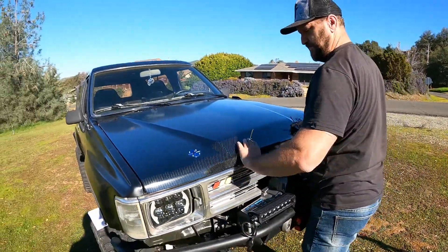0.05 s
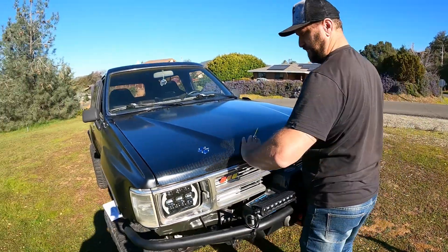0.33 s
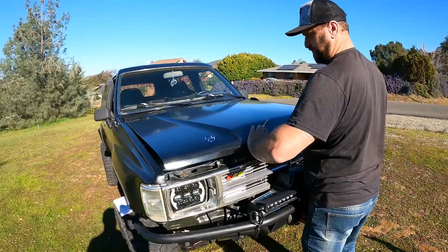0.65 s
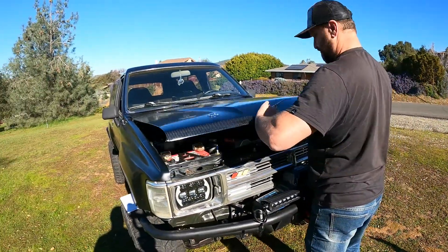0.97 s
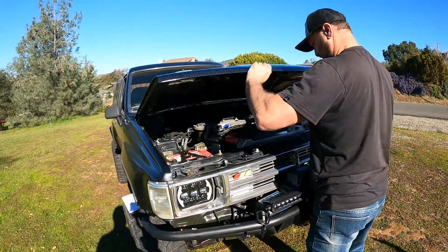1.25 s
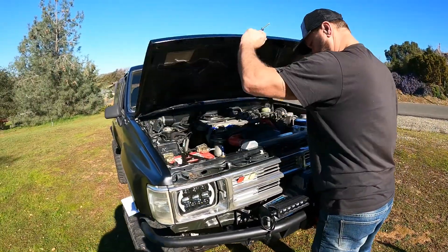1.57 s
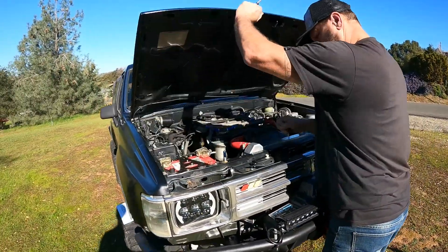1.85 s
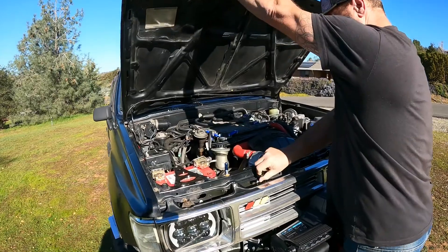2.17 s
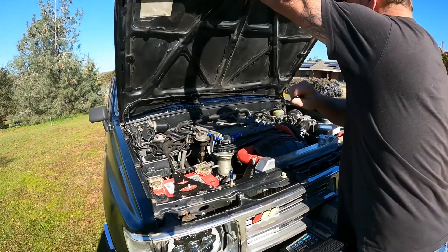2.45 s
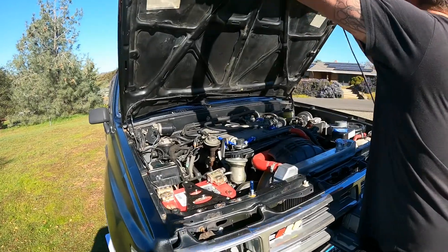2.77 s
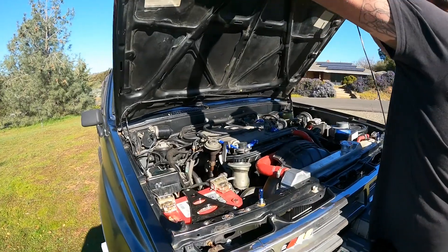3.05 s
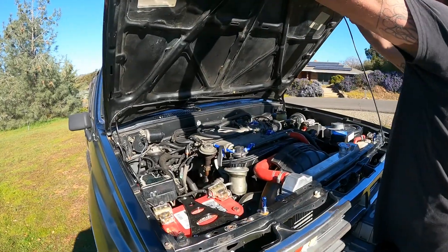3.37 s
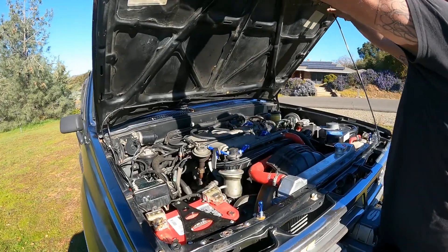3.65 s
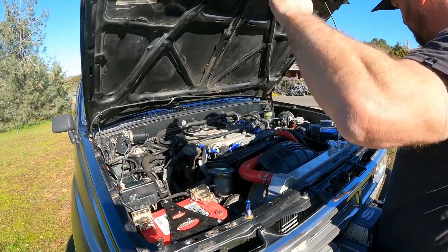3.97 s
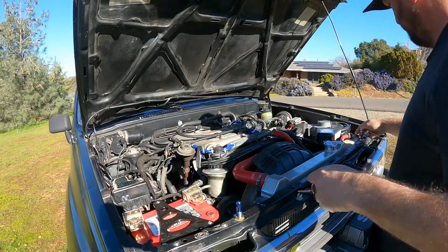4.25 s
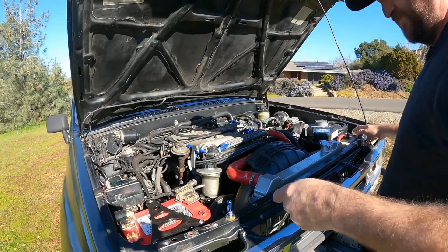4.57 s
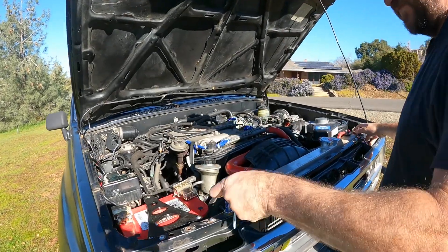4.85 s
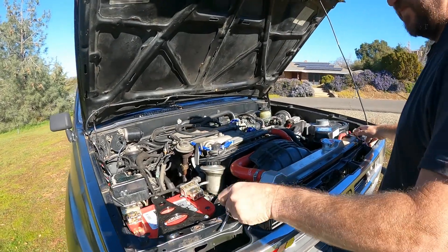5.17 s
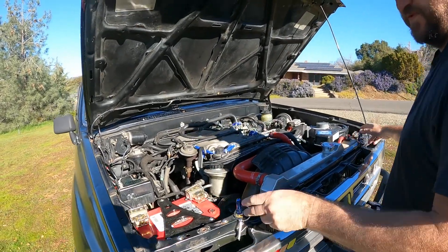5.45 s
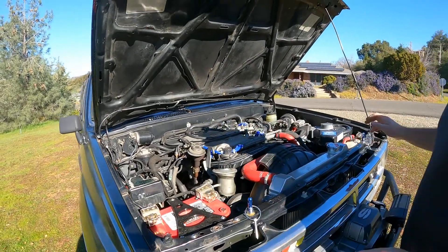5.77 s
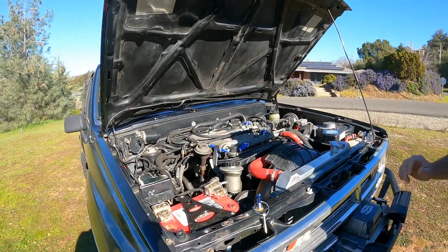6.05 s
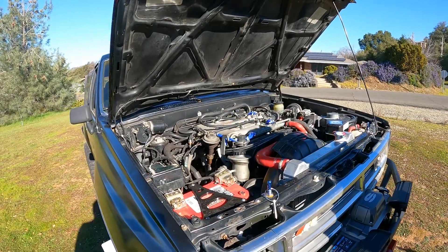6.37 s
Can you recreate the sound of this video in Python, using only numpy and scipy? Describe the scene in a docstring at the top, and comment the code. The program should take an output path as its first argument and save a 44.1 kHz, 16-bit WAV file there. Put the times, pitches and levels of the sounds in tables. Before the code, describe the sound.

A steel vehicle hood is opened close by in the open air: the catch knocks free, the hinge gives a brief stuttering squeal, and a few metal knocks lead to a loud clunk as the hood settles on its rod. A wrench bounces down in a quick run of bright clinks, and shoes shift softly on dry grass. Low wind buffeting on the microphone comes and goes throughout, over very faint birds and a distant hum.

```python
"""Outdoors, wind buffets the microphone over a hush, a far machine hum, birds and shoes on dry grass.
A truck's steel hood is unlatched: the panel knocks and the catch scrapes free. The hood rises on a dry
hinge that sticks and slips, juddering into a squeal. The prop rod is unclipped, scrapes and squeaks into
its seat, and the hood drops onto it. Last, a wrench clatters down in the engine bay and the shoes shift."""
import sys
import numpy as np
from scipy import signal
from scipy.fft import rfft, irfft
from scipy.io import wavfile
from scipy.ndimage import uniform_filter1d

SR = 44100
rng = np.random.default_rng(int(sys.argv[2]) if len(sys.argv) > 2 else 0)


def waveform_to_disk(signal):
    """Save audio, clipped to [-1, 1], as 16-bit WAV at the path in sys.argv[1]."""
    frames = np.transpose(np.atleast_2d(signal))
    scaled = np.clip(frames, -1, 1) * 32767
    samples = np.round(scaled).astype(np.int16)
    wavfile.write(sys.argv[1], SR, samples)


N = 287091
T = np.arange(N) / SR

WIND_LEVEL = [(0, -39), (.11, -22), (.47, -25), (.7, -20), (1.08, -26.5), (1.4, -22.5), (1.65, -22.5),
              (2.05, -35.5), (2.35, -40), (2.55, -27.5), (3.3, -36), (3.5, -30), (3.72, -31), (3.93, -22),
              (4.3, -40), (4.55, -22.5), (5.9, -23), (6.51, -16.5)]  # wind strength: time_s, level_db
WIND_SPECTRUM = [(5, -51), (16, -7), (28, -1), (45, 2), (70, 1.5), (100, -3.5), (140, -6), (200, -15),
                 (280, -28), (450, -34), (900, -61), (2000, -95.5)]  # turbulent rumble: freq_hz, density_db
EDDY_HITS = [(4.7, 0.07, -21), (4.98, 0.037, -18.5), (5.19, 0.034, -14.5), (5.36, 0.016, -14),
             (5.6, 0.098, -15.5), (6.06, 0.047, -16)]  # eddies square on the microphone: start_s, hold_s, level_db
EDDY_SPECTRUM = [(16, -8), (40, -4), (75, 5.5), (140, 3.5), (200, -8), (320, -19), (800, -37.5),
                 (2500, -72)]  # those eddies: freq_hz, density_db
HUSH_LEVEL = [(0, -44), (.13, -46), (.23, -54), (.65, -48), (.9, -54), (1.9, -55), (2.8, -50), (3.3, -54.5),
              (4.2, -53), (4.6, -57), (5.8, -52.5), (6.1, -51), (6.51, -49)]  # background hush, dipping after loud sounds and creeping back: time_s, level_db
HUSH_SPECTRUM = [(100, -1), (400, 0.5), (650, -9), (1100, -9), (1800, -14), (3000, -16.5), (4500, -18.5),
                 (7000, -25), (10000, -33.5), (12300, -31), (14000, -62.5)]  # background hush: freq_hz, density_db
HUM_TONES = [(366, -51.5), (452, -65.5), (1098, -68)]  # far machine: pitch_hz, level_db
BIRD_CALLS = [(.05, .25, 4750, 4400, -64), (.33, 0.32, 4650, 4400, -64), (2.85, 0.22, 4850, 4000, -68),
              (4.872, 0.04, 6900, 7900, -55), (6.17, 0.064, 4060, 4450, -59), (6.29, .08, 4050, 4450, -65)]  # far birds: start_s, length_s, from_hz, to_hz, level_db
SHOE_SHIFTS = [(.4, 0.033, -51), (6.03, 0.17, -49), (6.3, 0.014, -51), (6.43, 0.027, -48)]  # shoes on dry grass: start_s, hold_s, level_db
GRASS_SPECTRUM = [(200, -1), (900, 2.5), (1600, 1), (3500, -1), (7500, -18), (11000, -33), (14000, -64)]  # crunch underfoot: freq_hz, density_db

# blows on hood, catch and prop rod: start_s, level_db, bass_rel_db, top_rel_db, t60_s, local_hz
HOOD_HITS = [(0.683, -30.5, 1.5, -20.5, 1, 537), (0.72, -14, 6, -13.5, .12, 1045),
             (0.733, -14, -1.5, -20, 0.19, 960), (0.772, -29.5, 4, -14, 0.28, 229),
             (0.85, -36, 3, -30, 0.083, 506), (0.987, -32.5, 4.5, -31, 0.43, 479),
             (1.174, -34.5, -12.5, -38, 0.34, 638), (1.328, -27.5, 1.5, -53, 0.24, 512),
             (1.373, -26.5, -37, -32, 0.5, 1010), (2.202, -36, -23, -19, 0.29, 990),
             (2.228, -42, -2.5, -0.5, .11, 3000), (2.38, -14, -9.5, -16.5, 0.16, 1380),
             (2.473, -25.5, -3.5, -12, 0.12, 1340), (2.716, -35.5, -20, 6, 0.067, 5580),
             (3.391, -13, -5, -18.5, 0.2, 870), (3.882, -4, -7, -26.5, 0.15, 877),
             (3.925, -25, 5.5, -22, 0.35, 514), (3.966, -38, 11.5, -20, 0.38, 572),
             (4.02, -27.5, -15, -36, 0.11, 545), (4.434, -22.5, -11, -10, 0.16, 1184)]
HOOD_MODES = [(135.6, 1, 0.5), (209.7, 0, 0.6), (232.3, 1.5, 0.11), (288.5, -8, 0.11), (336, -3.5, 0.5),
              (410, -4, 0.18), (454.2, 6.5, 0.23), (522, -4, 0.82), (549, -10, 0.7), (634, -5, 0.95),
              (715, -10, 0.35), (911.5, -3.5, 0.42), (987, 9.5, 0.14), (1088, -3.5, 0.31),
              (1187, -7.5, 0.19), (1368, 0, 0.1), (1740, -2, .17), (2248, 4, .1), (2950, -2, 0.13)]  # sheet steel: freq_hz, level_db, t60_s
HOOD_SPECTRUM = [(60, -72), (140, -25.5), (300, -33.5), (550, -32.5), (1000, -36.5), (1600, -37),
                 (2300, -40), (3200, -37), (5000, -32), (8000, -38), (12000, -47.5), (16000, -83)]  # dense ring of the hood: freq_hz, density_db
CATCH_FORCE = [(1.06, 0.029, -19.5)]  # catch on its striker: start_s, hold_s, level_db
CATCH_SPECTRUM = [(100, -63.5), (220, -47), (330, -51), (460, -49.5), (900, -56), (1500, -54.5),
                  (2400, -57.5), (4000, -61.5), (7000, -66), (12000, -85), (16000, -100)]  # catch scrape: freq_hz, density_db

HINGE_WHINE = [(1.385, 0.066, 2520, 1926, -40)]  # hinge taking the load: start_s, length_s, from_hz, to_hz, level_db
HINGE_LIFT = [(1.454, 5, -21, 2037), (1.481, 4, -12.5, 2172), (1.528, 5, -11.5, 2426),
              (1.599, -2, -12.5, 2272), (1.645, -1, -10, 2320), (1.667, -5.5, -12.5, 2445),
              (1.688, -9, -13.5, 2248), (1.732, -48, -9.5, 2360), (1.781, -50, -13.5, 2210)]  # stages of the lift: time_s, jolt_db, squeal_db, pitch_hz
HINGE_MODES = [(640, -3.5, 0.9), (1398, 5.5, 0.29), (2270, 11, 0.086), (2430, -12, 0.18),
               (3600, -1.5, 0.49), (4150, -28.5, 0.054), (4550, 3, 0.064), (4880, 5, 0.4), (5600, -1, 0.23),
               (8300, -15, .15)]  # hinge resonances: freq_hz, level_db, t60_s
JOLT_SPECTRUM = [(70, -72), (180, -48.5), (350, -66), (600, -49), (850, -52.5), (1350, -49), (1800, -58.5),
                 (2300, -47.5), (3200, -57.5), (4600, -47.5), (5600, -53), (7000, -55), (11000, -77),
                 (15000, -94)]  # one hinge slip: freq_hz, density_db
SPRING_MODES = [(2200, 400, -4.5), (4800, 600, -6)]  # hood spring: freq_hz, width_hz, level_db
BAY_REFLECTIONS = [(.0031, -14), (.0058, -9), (.0104, -15), (.0163, -19.5)]  # off raised hood and engine: delay_s, level_db

ROD_FORCE = [(3.643, 0.012, -36), (3.731, 0.0027, -26), (3.855, 0.014, -14.5)]  # rod sliding into its seat: start_s, hold_s, level_db
ROD_SPECTRUM = [(100, -21), (450, 4.5), (850, 5), (1400, 1), (2000, -5), (4000, -24.5), (8000, -27.5),
                (14000, -65)]  # rod scrape: freq_hz, density_db
# rod tip in its seat: start_s, length_s, nominal_from_hz, nominal_to_hz, level_db
TIP_SQUEAKS = [(3.922, 0.036, 3160, 3210, -44), (3.925, .025, 2620, 2600, -45),
               (3.966, 0.0115, 3120, 3270, -27.5), (3.968, 0.0162, 2640, 2600, -31)]

# wrench on the radiator support: start_s, level_db, bass_rel_db, top_rel_db, t60_s, local_hz
WRENCH_HITS = [(4.6706, -4.5, -34.5, -9, 0.053, 4380), (4.6941, -19, -16.5, -13, 0.17, 3450),
               (4.8586, -41, -12, -16, 0.14, 1200), (4.959, -24.5, -25, -19, 0.24, 5440),
               (4.9785, -28, -9, -9, 0.23, 3070), (4.9936, -6, -23.5, -35, 0.12, 2280),
               (5.0651, -4, -23, -18.5, .12, 3780), (5.1495, -4.5, -22, -25, 0.084, 3680),
               (5.1618, -10.5, -12.5, -23, .11, 3590), (5.2521, -8, -25, -18, 0.11, 4020),
               (5.3241, -21, -6, -8, 0.17, 1527), (5.3449, -2.5, -22, -27, 0.097, 2470),
               (5.39, -8.5, -24, -30, 0.12, 3880), (5.406, -6.5, -16.5, -17.5, 0.092, 1870),
               (5.5825, -34, -5.5, -11, 0.53, 1930), (5.6186, -10, -19, -24.5, 0.078, 4080),
               (5.6311, -12.5, -16.5, -33, 0.22, 1624), (5.685, -9.5, -18, -9, 0.097, 4040),
               (5.7148, -17, -18.5, -19, 0.17, 2050)]
WRENCH_MODES = [(556, 11.5, 0.25), (975, 2, 0.24), (1467, -3, 0.28), (1635, 0, 0.17), (1826, 0.5, 0.18),
                (2590, -3, 0.086), (3730, 1, 0.059), (3960, 3, 0.06), (4354, 9.5, 0.046),
                (4780, 6.5, 0.041), (5540, 8, 0.052), (7850, -4, 0.06), (8150, -9, 0.033), (11400, 0, 0.04)]  # wrench and bracket: freq_hz, level_db, t60_s
WRENCH_SPECTRUM = [(100, -40), (300, -30.5), (550, -33.5), (1000, -30.5), (1800, -38.5), (2700, -46),
                   (4000, -43.5), (6000, -39), (8500, -37), (10000, -37.5), (12000, -36.5), (13500, -65),
                   (15000, -71), (16000, -69)]  # their dense ring: freq_hz, density_db


def undb(db):
    return 10 ** (np.asarray(db) / 20)


def curve(rows):
    """Rows of (time_s, value) at every sample."""
    return np.interp(T, *np.transpose(rows))


def db_at(hz, spectrum):
    """Spectrum level, interpolated over log frequency."""
    freq_hz, db = np.transpose(spectrum)
    return np.interp(np.log(np.maximum(hz, 1)), np.log(freq_hz), db)


def unit_rms(x):
    return x / np.sqrt(np.mean(x ** 2))


def noise(spectrum):
    """Shaped noise, rms 1."""
    gain = undb(db_at(np.arange(N // 2 + 1) * SR / N, spectrum))
    return unit_rms(irfft(rfft(rng.standard_normal(N)) * gain, N))


def drift(rate_hz):
    """Smooth random signal, rms 1."""
    hold = int(SR / rate_hz)
    stairs = np.repeat(rng.standard_normal(N // hold + 1), hold)[:N]
    return unit_rms(uniform_filter1d(stairs, hold))


def decay(t, t60_s):
    return np.exp(-np.log(1000) * t / t60_s)


def add(out, start_s, x):
    i = int(start_s * SR)
    out[i:i + len(x)] += x[:N - i]


def swells(rows, rise_db_per_s, fall_db_per_s):
    """Gain that rises until each start_s, holds, then falls."""
    return sum(undb(db - rise_db_per_s * np.maximum(start_s - T, 0)
                    - fall_db_per_s * np.maximum(T - start_s - hold_s, 0))
               for start_s, hold_s, db in rows)


def chirps(rows, waver, waver_hz, partials=((1, 0),)):
    """Short glides of unsteady pitch; partials: ratio, level_db."""
    out, wobble = np.zeros(N), 1 + waver * drift(waver_hz)
    for start_s, length_s, from_hz, to_hz, db in rows:
        n = int(length_s * SR)
        pitch_hz = np.linspace(from_hz, to_hz, n) * wobble[int(start_s * SR):][:n]
        phase = 2 * np.pi * np.cumsum(pitch_hz) / SR
        tone = sum(undb(partial_db) * np.sin(ratio * phase) for ratio, partial_db in partials)
        add(out, start_s, undb(db) * np.sqrt(2) * signal.windows.tukey(n, 0.5) * tone)
    return out


def scatter(x, t60_s):
    """Dense reflections at unit energy gain."""
    response = rng.standard_normal(SR) * decay(T[:SR], t60_s)
    return signal.fftconvolve(x, response / np.linalg.norm(response))[:N]


def wind():
    """Turbulence on two microphone ports; the hardest buffets carry smaller, faster eddies."""
    level_db = curve(WIND_LEVEL)
    rumble = undb(level_db + 2.3 * drift(20))
    buffet = swells(EDDY_HITS, rise_db_per_s=298, fall_db_per_s=291)
    shared, *own = [rumble * noise(WIND_SPECTRUM) + buffet * noise(EDDY_SPECTRUM) for _ in range(3)]
    ports = shared + undb(-10) * np.array(own)
    right_bias_db = 6 + 0.01 * (level_db + 22)
    return ports * undb(np.array([-right_bias_db, right_bias_db]) / 2)


def hush():
    """Outdoor background noise, partly common to both channels; the level dips and creeps back."""
    shared = noise(HUSH_SPECTRUM)
    pair = np.array([shared + 1.46 * noise(HUSH_SPECTRUM) for _ in range(2)])
    return pair * undb(curve(HUSH_LEVEL) + 0.5 * drift(8.4))


def machine_hum():
    """Far machine: three tones wavering in level and pitch."""
    out = np.zeros(N)
    for hz, db in HUM_TONES:
        amplitude = np.sqrt(2) * undb(db + 2.2 * drift(3.8))
        pitch_hz = hz * (1 + 0.005 * drift(11))
        out += amplitude * np.sin(2 * np.pi * np.cumsum(pitch_hz) / SR)
    return out


def birds():
    """Far calls: fluttering glides, blurred by reflections."""
    calls = chirps(BIRD_CALLS, waver=0.032, waver_hz=90)
    return scatter(calls * undb(6.5 * drift(40)), t60_s=0.36)


def shoes():
    """Dry grass crunching underfoot: rough swells of noise."""
    pressure = swells(SHOE_SHIFTS, rise_db_per_s=437, fall_db_per_s=250)
    return noise(GRASS_SPECTRUM) * pressure * undb(3.2 * drift(180))


def noise_bands():
    """Third-octave noise standing in for dense modes: centre_hz, samples."""
    bands, edge = [], 2 ** (1 / 6)
    for hz in 76 * 2 ** (np.arange(24) / 3):
        bandpass = signal.butter(4, [hz / edge, hz * edge], "band", fs=SR, output="sos")
        bands.append((hz, unit_rms(signal.sosfilt(bandpass, rng.standard_normal(N)))))
    return bands


def blow(bands, colour_db, modes, t60_s, rise_s, ring_db, damping=0.34, tail_db=-27, detune=0.0045):
    """Struck body: bright crack, dense ring (t60_s at 1 kHz, shorter above), dull tail, clear modes."""
    t, offset = T[:SR * 3 // 4], rng.integers(N - SR)
    out = np.zeros(len(t))
    for hz, band in bands:
        life = (hz / 1000) ** -damping
        crack = undb(1.5) * decay(t, 0.0067) * hz / (hz + 5000)
        tail = undb(tail_db) * decay(t, 0.42 * life) / (1 + (hz / 5000) ** 4)
        envelope = crack + decay(t, t60_s * life) + tail
        out += undb(colour_db(hz) - 5) * np.sqrt(hz) * envelope * band[offset:offset + len(t)]
    for hz, db, mode_t60_s in modes:
        spot_db = 3 * rng.standard_normal()  # each contact point excites and loads modes differently
        loaded_hz = hz * (1 + detune * rng.standard_normal())
        amplitude = undb(colour_db(hz) + db + ring_db + spot_db) * np.sqrt(hz) / 2
        envelope = decay(t, min(mode_t60_s, 2 * t60_s))  # a hand on the metal stops long rings
        out += amplitude * envelope * np.sin(2 * np.pi * (loaded_hz * t + rng.random()))
    return out * (1 - np.exp(-t / rise_s))


def blows(bands, hits, spectrum, modes, tilt_hz, local_db, ring_db, **body):
    """Series of hits; each landing spot tilts the spectrum and rings three local modes."""
    out = np.zeros(N)
    for start_s, db, bass_db, top_db, t60_s, local_hz in hits:
        tilt = list(zip(tilt_hz, [bass_db, 0, top_db]))
        colour_db = lambda hz: db + db_at(hz, spectrum) + db_at(hz, tilt)
        local = [(ratio * local_hz, local_db - ring_db, t60_s) for ratio in (0.95, 1, 1.07)]
        add(out, start_s, blow(bands, colour_db, modes + local, t60_s, ring_db=ring_db, **body))
    return out


def hood_knocks(bands):
    """Blows on hood, catch and rod ring the sheet steel."""
    return blows(bands, HOOD_HITS, HOOD_SPECTRUM, HOOD_MODES, tilt_hz=[300, 2000, 8500],
                 local_db=1, ring_db=0, rise_s=0.002, damping=0.6, tail_db=-15.5, detune=0.004)


def rub(bands, force, spectrum, slips_per_s, t60_s, ring_db):
    """Friction: dense tiny slips drive the hood panel."""
    slips = (rng.random(N) < slips_per_s / SR) * rng.standard_normal(N)
    panel = blow(bands, lambda hz: db_at(hz, spectrum), HOOD_MODES, t60_s,
                 rise_s=0.00083, ring_db=ring_db)
    return signal.fftconvolve(unit_rms(slips) * force, panel / np.linalg.norm(panel))[:N]


def catch(bands, grip_s=1):
    """The catch grips, presses harder and rubs past its striker."""
    force = swells(CATCH_FORCE, rise_db_per_s=163.5, fall_db_per_s=607) * (T > grip_s)
    return rub(bands, force, CATCH_SPECTRUM, slips_per_s=1400, t60_s=0.14, ring_db=-2)


def hinge(bands, slip_s=0.0235, squeal_delay_s=0.0027, squeal_s=0.014):
    """Stick-slip: each slip is a jolt and a brief squeal; the jolts fade as the hood rises."""
    times_s, *controls = np.transpose(HINGE_LIFT)
    stages = [np.linspace(from_s, to_s, max(1, round((to_s - from_s) / slip_s)), endpoint=False)
              for from_s, to_s in zip(times_s, times_s[1:])]
    jolts, notes = np.zeros(N), list(HINGE_WHINE)
    for start_s in np.concatenate(stages + [times_s[-1:]]):
        jolt_db, squeal_db, pitch_hz = (np.interp(start_s, times_s, column) for column in controls)
        jolt = blow(bands, lambda hz: db_at(hz, JOLT_SPECTRUM), HINGE_MODES, t60_s=0.085,
                    rise_s=0.0014, ring_db=-4, damping=0.3, tail_db=-27.5, detune=0.022)
        add(jolts, start_s, undb(jolt_db) * jolt)
        sag_hz = pitch_hz * (0.06 + 0.1 * rng.standard_normal())
        from_hz, to_hz = pitch_hz + sag_hz / 2, pitch_hz - sag_hz / 2
        notes.append((start_s + squeal_delay_s, squeal_s, from_hz, to_hz, squeal_db))
    return jolts + hinge_squeal(notes)


def hinge_squeal(notes):
    """Rough friction tones echo in the bay and leave the hood spring ringing."""
    # alternate cycles slip unevenly: weak tone an octave below
    partials = [(0.5, -30), (1, 0), (2, -7), (3, -22), (4, -31), (5, -36), (6, -45)]
    squeal = chirps(notes, waver=0.022, waver_hz=700, partials=partials)
    squeal *= undb(2 * drift(400)) * (1 + undb(-40) * rng.standard_normal(N))
    echoes = sum(undb(db) * np.roll(squeal, int(delay_s * SR)) for delay_s, db in BAY_REFLECTIONS)
    spring = sum(undb(db) * signal.lfilter(*signal.iirpeak(hz, hz / width_hz, fs=SR), squeal)
                 for hz, width_hz, db in SPRING_MODES)
    ring = undb(-10) * scatter(squeal, t60_s=0.15) + undb(-26) * scatter(spring, t60_s=1.1)
    return 0.94 * (squeal + echoes) + ring


def prop_rod(bands):
    """The rod scrapes home; its tip squeaks in the seat."""
    force = swells(ROD_FORCE, rise_db_per_s=817, fall_db_per_s=553)
    scrape = rub(bands, force, ROD_SPECTRUM, slips_per_s=2800, t60_s=0.12, ring_db=-7)
    squeaks = chirps(TIP_SQUEAKS, waver=0.037, waver_hz=604, partials=[(0.96, 0.0027)])
    return scrape + scatter(squeaks, t60_s=0.095)


def wrench(bands):
    """Steel on steel: the falling wrench and the bracket under it ring at each bounce."""
    return blows(bands, WRENCH_HITS, WRENCH_SPECTRUM, WRENCH_MODES, tilt_hz=[500, 3400, 8500],
                 local_db=2.5, ring_db=-2.5, rise_s=0.001, damping=0.24, tail_db=-20.5, detune=0.0257)


def bay_stereo(x, above_hz=900, delay_s=0.0024):
    """The engine bay reflects differently to each port, except at long wavelengths."""
    treble = signal.sosfilt(signal.butter(2, above_hz, "high", fs=SR, output="sos"), x)
    side = undb(-9.5) * scatter(np.roll(treble, int(delay_s * SR)), t60_s=0.03)
    return np.array([x + side, x - side])


def scene():
    """Truck sounds in wind and open air, stereo."""
    bands = noise_bands()
    truck = hood_knocks(bands) + catch(bands) + hinge(bands) + prop_rod(bands) + wrench(bands)
    return bay_stereo(truck) + wind() + hush() + machine_hum() + birds() + shoes()


def record(dry, cutoff_hz=15800):
    """Soft peak limit, brief fades at both ends, low-pass."""
    rounded = dry / (1 + dry ** 6) ** (1 / 6)
    lowpass = signal.ellip(6, 0.1, 50, cutoff_hz, fs=SR, output="sos")
    return signal.sosfiltfilt(lowpass, rounded * signal.windows.tukey(N, 0.002))


dry = scene()
out = record(dry)
waveform_to_disk(out)
```